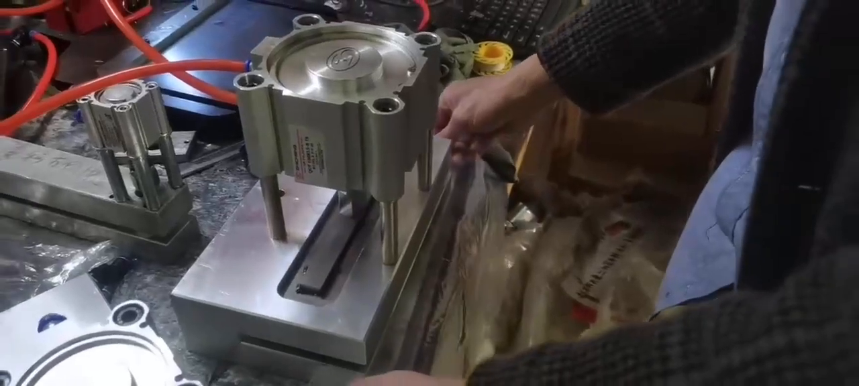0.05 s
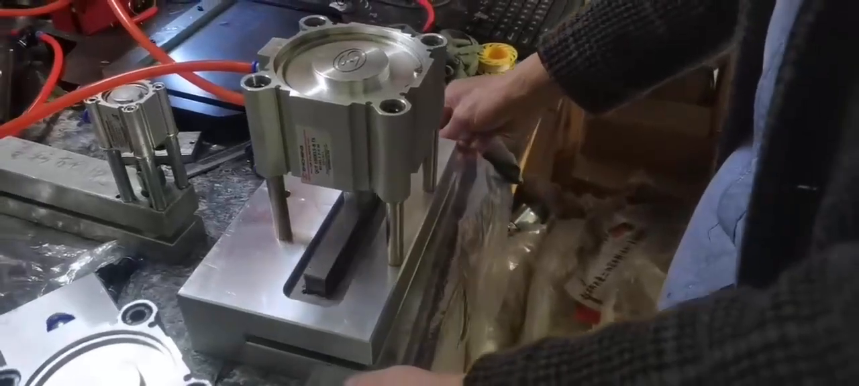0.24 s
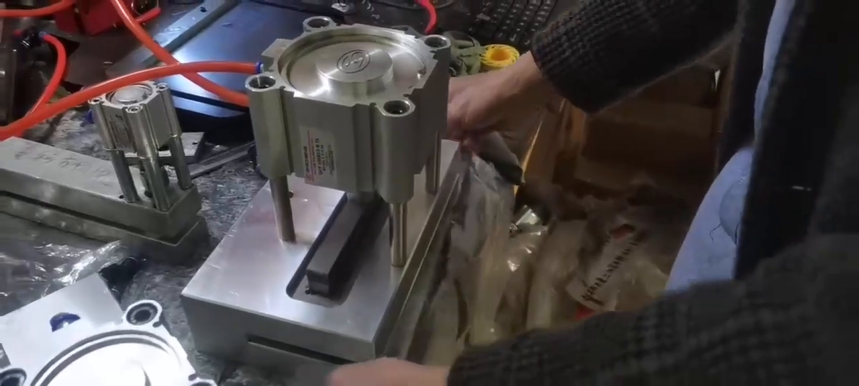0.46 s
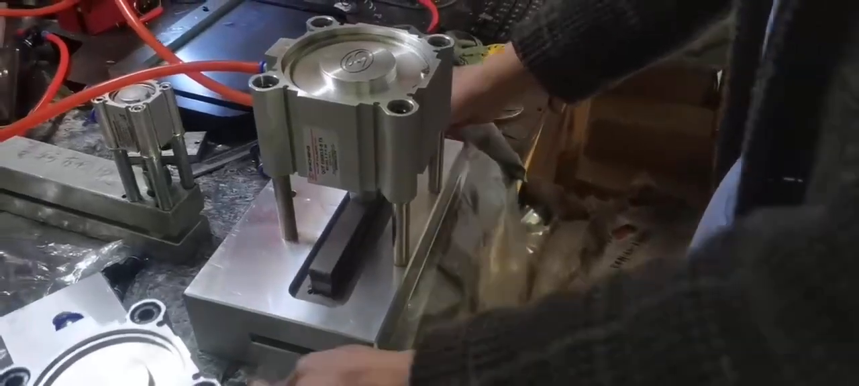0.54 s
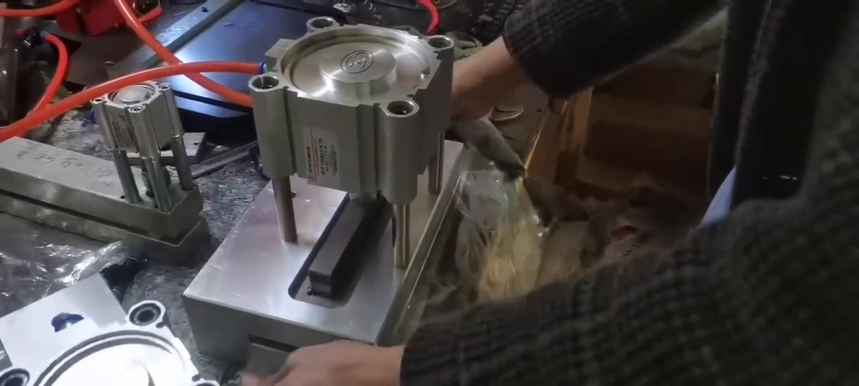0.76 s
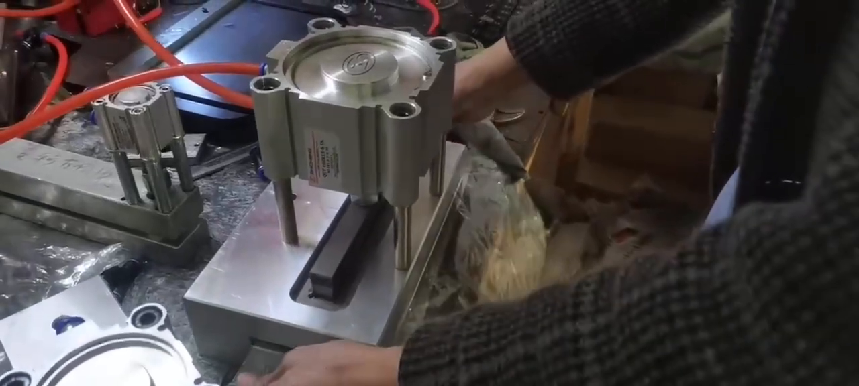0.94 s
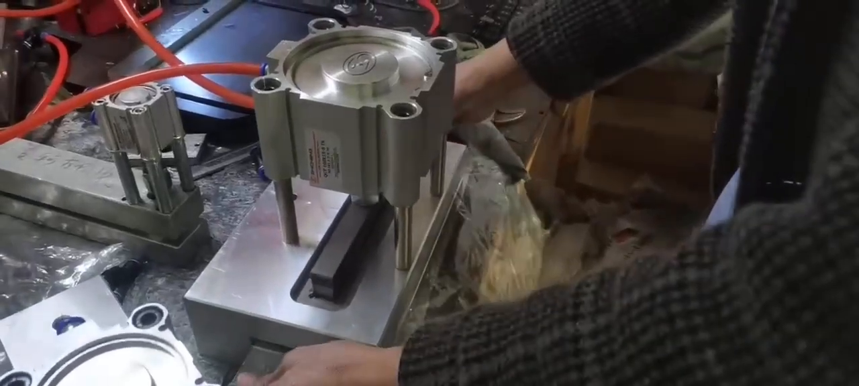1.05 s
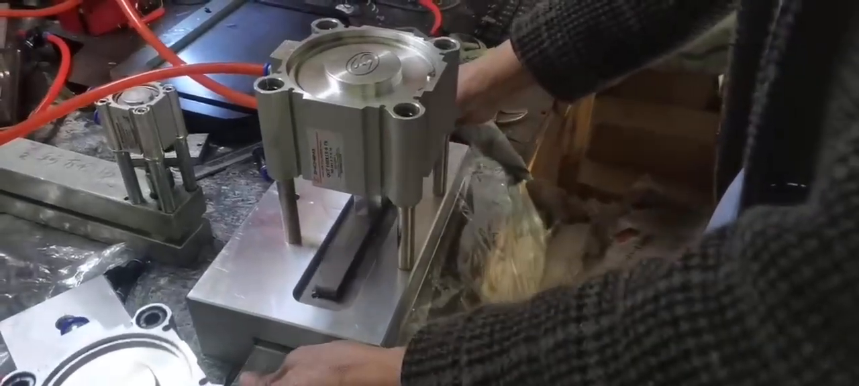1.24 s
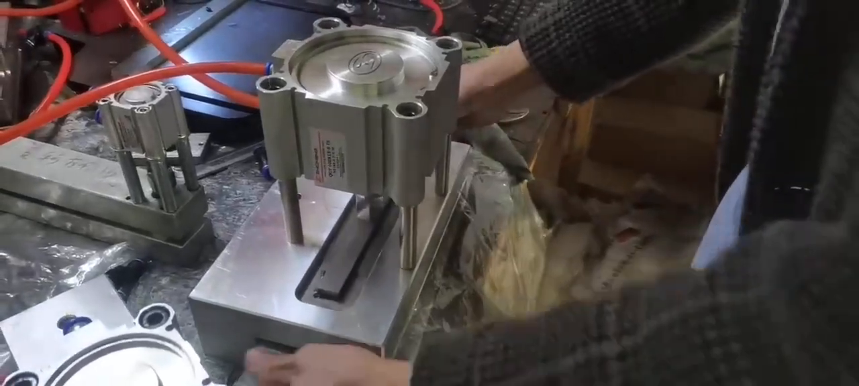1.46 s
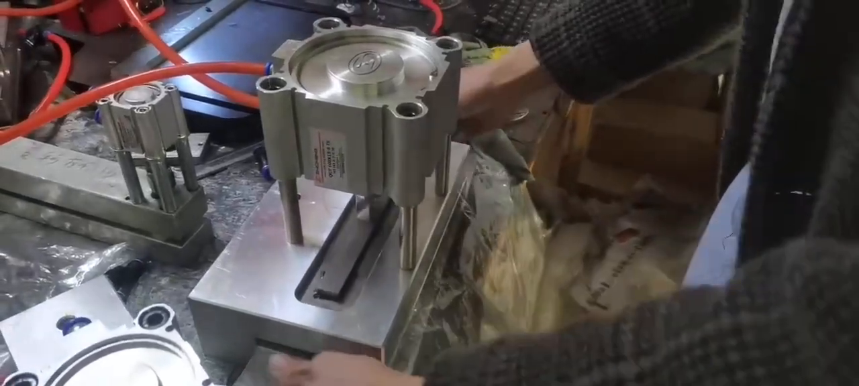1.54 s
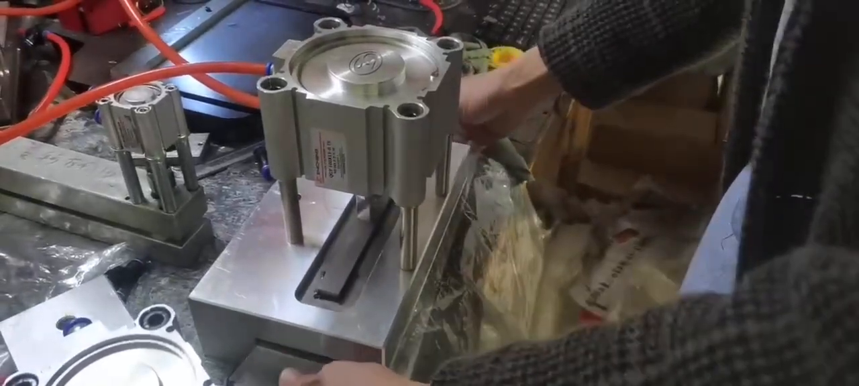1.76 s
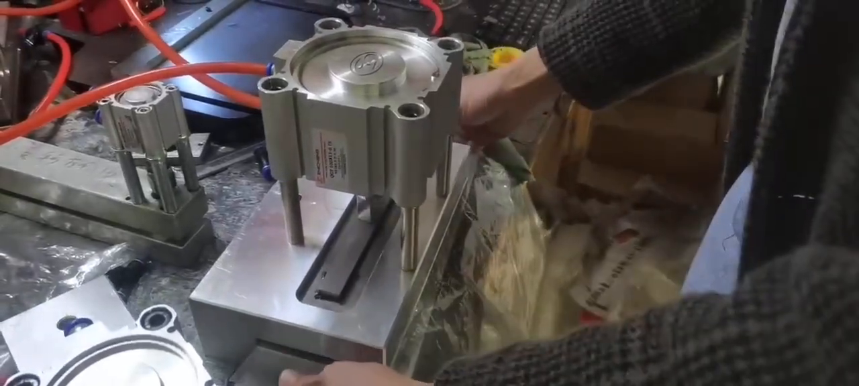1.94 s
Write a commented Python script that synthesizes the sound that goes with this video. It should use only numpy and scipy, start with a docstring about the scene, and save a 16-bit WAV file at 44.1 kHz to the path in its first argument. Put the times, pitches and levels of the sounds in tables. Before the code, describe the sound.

Small air-powered press fires down then back with snappy valve clicks, exhaust hisses and steel knocks

```python
"""A steady air leak, a low rumble and faint hums fill a workshop: shaped noise and brief sine swells.
Then a small pneumatic punch on a bench makes one stroke down and, about a second later, one stroke back.
On each stroke air hisses from the exhaust (noise with whistling ports) and the valve clicks and puffs.
Steel parts knock and ring the die, and the piston hits its stops and makes the bench boom (fading sines).
The room answers the air and the steel with a fading tail of noise."""
import sys
import numpy as np
from scipy import signal
from scipy.fft import rfft, irfft, next_fast_len
from scipy.io import wavfile
from scipy.ndimage import uniform_filter1d

SR = 44100
rng = np.random.default_rng(int(sys.argv[2]) if len(sys.argv) > 2 else 0)


def inscribe(sig):
    """Save sig as 16-bit PCM at rate SR to the path in sys.argv[1].

    A 1-D sig is mono; a 2-D sig holds one channel per row.
    Samples are clipped to [-1, 1] before scaling.
    """
    pcm = np.round(np.clip(np.atleast_2d(sig).T, -1, 1) * 32767)
    wavfile.write(sys.argv[1], SR, pcm.astype(np.int16))


N = 88200
TIME = np.arange(N) / SR

# Tone colour of the air leak: pitch_hz, level_db (per Hz, relative)
LEAK_SPECTRUM = [(400, -8), (900, -16), (1120, -12.5), (1720, -17), (1960, -9), (2970, -9), (4140, 0),
                 (5300, -6), (6600, 1.5), (7900, -9.5), (9850, -9), (13800, -8), (14200, -45)]
# Loudness of the air leak: time_s, level_db
LEAK_LEVEL = [(0, -46.5), (.7, -47.5), (1.05, -46), (1.5, -49), (2, -50.5)]
# Tone colour of the building's rumble: pitch_hz, level_db (per Hz, relative)
RUMBLE_SPECTRUM = [(15, -37), (25, -6.5), (54, 0), (135, -13.5), (184, -7.5), (256, -13.5), (281, -17),
                   (367, -21), (600, -53), (780, -108)]
# Loudness of the rumble: time_s, level_db
RUMBLE_LEVEL = [(0, -42), (.2, -48.5), (.7, -47.5), (.9, -52), (1.0, -47), (1.3, -44.5), (1.5, -49.5),
                (1.75, -57), (1.93, -48), (2, -43.5)]
# Faint hums that swell and fade: middle_s, length_s, pitch_hz, level_db
HUMS = [(.005, 0.022, 172, -35), (0.622, 0.42, 547.5, -61), (0.897, 0.12, 247.3, -53),
        (1.737, 0.21, 48.04, -40.5), (1.826, 0.047, 189.6, -52.5), (1.932, 0.086, 184.7, -43)]

# Exhaust air, one list for each stroke: time_s, level_db, treble_db and low_db (both relative to the body)
EXHAUST_STROKES = [
    [(.2005, -43, -8, -19), (.2025, -23.5, 3, -2), (.212, -24.5, -11, -22), (.222, -17.5, -7, -14.5),
     (.26, -21, -4, -11.5), (.32, -25.5, -10.5, -11.5), (.36, -22, -12.5, -7.5), (.41, -22.5, -9, -20),
     (.45, -32.5, -8, -9.5), (.48, -41, -18, -15), (.56, -55, -30, -1)],
    [(1.092, -41, -13, -12), (1.1075, -34, -17, -31), (1.1115, -22, -19, -5), (1.13, -18.5, -8, -19),
     (1.155, -28, -7.5, -49), (1.186, -27.5, -12, -39), (1.235, -23.5, -11, -23.5),
     (1.285, -26, -13.5, -2.5), (1.34, -39.5, -16, -26), (1.40, -54, -20, -11), (1.46, -59, -12, -12)],
]
# Tone colour of the main hiss: pitch_hz, level_db (per Hz, relative)
JET_SPECTRUM = [(500, -30), (858, -11), (1850, -9), (2500, -2.5), (3040, -5), (4190, 0), (5220, -2.5),
                (7030, 3), (7800, -8), (10100, -18), (17200, -120)]
# Tone colour of the treble part: pitch_hz, level_db (per Hz, relative)
JET_TREBLE_SPECTRUM = [(9000, -9), (10300, 6.5), (11300, -0.5), (12900, 7), (13900, -3.5), (14300, -36)]
# Tone colour of the low rush: pitch_hz, level_db (per Hz, relative)
JET_LOW_SPECTRUM = [(60, 9), (150, 4.5), (250, 4), (450, -2), (900, -24.5), (1900, -3), (2500, -24)]
# Whistling exhaust ports: pitch_hz, half_width_hz, down_stroke_db, back_stroke_db (relative)
PORT_WHISTLES = [(2640, 130, 4, -8), (4240, 470, 6, -2.5), (6770, 220, -1, -6), (7270, 390, -15, 5)]
WHISTLE_DB = -5  # all ports together, relative to the main hiss

# Valve switching: click_s, click_db, click_hz, click_rise_s, crack_db, puff_s, puff_db
VALVE_SWITCHES = [(0.2036, 2.5, 4260, 0.0018, -5.5, .2135, -6),
                  (1.1085, -13.5, 2966, 0.00085, -10.5, 1.1162, -8)]
# Tones of the thump in the hoses: pitch_hz, level_db (relative), fade_s (time to fall 60 dB)
PUFF_TONES = [(134.5, -11.5, 0.11), (161.4, -8.5, 0.13), (202.5, 4.5, 0.031), (281, -3, 0.035),
              (359.7, -23.5, 0.2), (463.7, -25.5, 0.19)]
CLICK_FADE_S, CRACK_HALF_WIDTH_HZ = 0.012, 9900  # the fade is the time to fall 60 dB
PUFF_RISE_S, PUFF_CUT_HZ = 0.0023, 52  # the hoses radiate little below this pitch

# How fast the workshop's answer dies: pitch_hz, fade_s (time to fall 60 dB)
ROOM_FADE = [(100, 0.18), (500, 0.38), (2000, 0.62), (5000, 0.36), (12000, 0.04)]
ROOM_AIR_DB, ROOM_STEEL_DB = -13, -14  # how much of each sound is sent to the room

# Steel hitting steel: start_s, level_db, best_hz (pitch excited most), spread_octaves
STEEL_KNOCKS = [(0.246, -19.5, 1430, 0.61), (.3302, -14.5, 2070, 1.17), (.348, -19.5, 2900, 0.79),
                (1.1545, -13.5, 1660, 0.16), (1.1552, -14, 7050, .3), (1.156, -15.5, 2580, 0.085),
                (1.2625, -20, 950, 0.31)]
# Ringing tones of the die: pitch_hz, level_db (relative), fade_s (time to fall 60 dB)
DIE_TONES = [(769, -7.5, 0.14), (855, 4.5, 0.017), (1027, -5.5, 0.042), (1525, -6.5, 0.039),
             (1641, -3, 0.042), (2220, 7, 0.04), (2657, -12, 0.17), (2790, -5.5, 0.065), (2940, 0, 0.039),
             (3125, -9, 0.085), (6980, 10, 0.016)]
STEEL_RISE_S, STEEL_SCATTER_S = 0.0011, 0.00053

# Piston stops shaking the bench: start_s, level_db, best_hz (pitch excited most), spread_octaves
PISTON_STOPS = [(.3305, -9.5, 115, 0.78), (.376, -15.5, 109, 0.6), (1.263, -20, 143, 0.65),
                (1.277, -31, 127, 0.55), (1.325, -22.5, 177, 0.29), (1.44, -41, 185, 0.52)]
# Booming tones of the bench: pitch_hz, level_db (relative), fade_s (time to fall 60 dB)
BENCH_TONES = [(49.8, -10, 1), (82.2, -8, 0.86), (103.5, -15, 0.83), (123.5, -3.5, 0.5), (138.6, -2, 0.22),
               (151.3, -9.5, 0.27), (166.5, -15, 0.71), (192, -19.5, 0.59), (293, -2.5, 0.13)]
BENCH_RISE_S = 0.0062

# Treble band that stays silent: low_edge_hz, high_edge_hz
SILENT_BAND = (8000, 9500)
TOP_HZ, LOW_CUT_HZ = 15100, 11.5


def amp(db):
    """Turn decibels into a plain multiplier."""
    return 10 ** (np.asarray(db) / 20)


def unit(x):
    """Scale a signal to an average (rms) strength of 1."""
    return x / np.sqrt(np.mean(x ** 2) + 1e-20)


def along(points, hz):
    """Read a value between (pitch, value) points, on a logarithmic pitch axis."""
    point_hz, values = np.transpose(points)
    return np.interp(np.log(hz + 1), np.log(point_hz + 1), values)


def curves(rows, outside=None):
    """Give one value per sample for each column after the time."""
    times, *columns = np.transpose(rows)
    return [np.interp(TIME, times, column, outside, outside) for column in columns]


def filtered(x, response):
    """Multiply each frequency of x by the response at that frequency."""
    size = next_fast_len(N + SR // 2)  # spare room so the end does not wrap onto the start
    hz = np.fft.rfftfreq(size, 1 / SR)
    return irfft(rfft(x, size) * response(hz), size)[:N]


def shape(points):
    """Make the gain curve of a (pitch, level) spectrum, silent outside its ends."""
    return lambda hz: amp(along(points, hz)) * (hz >= points[0][0]) * (hz <= points[-1][0])


def rush(gain, patchy_db):
    """Rushing air or rumble: coloured noise of rms 1 whose loudness varies in random patches."""
    grid = signal.stft(rng.standard_normal(N + 512), nperseg=512)[2]
    # Smooth random numbers over pitch, then over time, so neighbours share a patch
    patches = uniform_filter1d(rng.standard_normal(grid.shape), size=5, axis=0)
    patches = uniform_filter1d(patches, size=6, axis=1)
    noise = signal.istft(grid * amp(patchy_db * unit(patches)), nperseg=512)[1][:N]
    return unit(filtered(noise, gain))


def soft_start(t, rise_s):
    """Rise smoothly from 0 towards 1."""
    return 1 - np.exp(-(t / rise_s) ** 2)


def ring(start_s, tones, rise_s):
    """A struck object rings as several sines, each fading at its own speed."""
    t = np.maximum(TIME - start_s, 0)
    tone_sum = sum(amp(db - 60 * t / fade_s) * np.sin(2 * np.pi * hz * t) for hz, db, fade_s in tones)
    return soft_start(t, rise_s) * tone_sum


def struck(blows, tones, rise_s, scatter_s):
    """Each blow mostly rings the tones near its own pitch; scatter_s spreads their starts at random."""
    out = np.zeros(N)
    for blow_s, blow_db, best_hz, spread_octaves in blows:
        for hz, tone_db, fade_s in tones:
            distance = np.log2(hz / best_hz) / spread_octaves
            level_db = blow_db + tone_db - 6 * distance ** 2
            start_s = blow_s + scatter_s * rng.random()
            out += ring(start_s, [(hz, level_db, fade_s)], rise_s)
    return out


def background():
    """Leaking air and the building's rumble are shaped noise; the passing hums are sines."""
    leak = amp(curves(LEAK_LEVEL)[0]) * rush(shape(LEAK_SPECTRUM), patchy_db=2.0)
    rumble = amp(curves(RUMBLE_LEVEL)[0]) * rush(shape(RUMBLE_SPECTRUM), patchy_db=3)
    hums = np.zeros(N)
    for middle_s, length_s, hz, db in HUMS:
        swell = np.exp(-(2 * (TIME - middle_s) / length_s) ** 4)
        hums += amp(db) * swell * np.sin(2 * np.pi * hz * TIME)
    return leak + rumble + hums


def exhaust():
    """Turbulent jet: a broad hiss, ports that whistle differently each way, a treble and a low rush."""
    hiss = rush(shape(JET_SPECTRUM), patchy_db=2.5)
    treble = rush(shape(JET_TREBLE_SPECTRUM), patchy_db=3.0)
    low = rush(shape(JET_LOW_SPECTRUM), patchy_db=4.5)
    out = np.zeros(N)
    for way, stroke in enumerate(EXHAUST_STROKES):  # 0 is down, 1 is back

        def ports(f):
            return sum(amp(db[way]) / (1 + ((f - hz) / half_width) ** 2)
                       for hz, half_width, *db in PORT_WHISTLES)

        body = unit(hiss + amp(WHISTLE_DB) * rush(ports, patchy_db=0))
        level_db = curves(stroke, outside=-150)[0]  # practically silent outside the stroke
        treble_db, low_db = curves(stroke)[1:]
        out += amp(level_db) * (body + amp(treble_db) * treble + amp(low_db) * low)
    return out


def valve():
    """The spool snaps over with a bright click, then the pressure step thumps in the hoses."""
    out = np.zeros(N)
    for click_s, click_db, click_hz, rise_s, crack_db, puff_s, puff_db in VALVE_SWITCHES:
        t = np.maximum(TIME - click_s, 0)

        def crack_gain(f):
            in_band = (f > 2400) * (f < 14200)
            return in_band / (1 + ((f - click_hz) / CRACK_HALF_WIDTH_HZ) ** 2)

        crack = unit(filtered(rng.standard_normal(N), crack_gain))
        snap = amp(click_db) * np.sin(2 * np.pi * click_hz * t) + amp(crack_db) * crack
        out += amp(-60 * t / CLICK_FADE_S) * soft_start(t, rise_s) * snap

        thump = ring(puff_s, PUFF_TONES, PUFF_RISE_S)
        out += amp(puff_db) * filtered(thump, lambda f: (1j * f / (PUFF_CUT_HZ + 1j * f)) ** 2)
    return out


def room(x):
    """The workshop answers with a noise tail in which each frequency dies at its own speed."""
    hz, t, grid = signal.stft(rng.standard_normal(SR), SR, nperseg=256)
    fade_s = along(ROOM_FADE, hz)[:, None]
    tail = signal.istft(grid * amp(-60 * t / fade_s), SR, nperseg=256)[1]
    delayed = np.pad(x, (300, 0))  # 300 samples, about 7 ms
    return signal.fftconvolve(delayed, tail / np.linalg.norm(tail))[:N]


def die():
    """Steel parts knock together and ring; the tones of a knock start a tiny moment apart."""
    return struck(STEEL_KNOCKS, DIE_TONES, STEEL_RISE_S, STEEL_SCATTER_S)


def bench():
    """Each stop and rebound of the piston sets the bench booming."""
    return struck(PISTON_STOPS, BENCH_TONES, BENCH_RISE_S, scatter_s=0)


def scene():
    """Add all the sounds; only the air and the steel are sent to the room."""
    air = exhaust() + valve()
    steel = die()
    echo = room(amp(ROOM_AIR_DB) * air + amp(ROOM_STEEL_DB) * steel)
    return (background() + air + echo + steel + bench())[None]


def record(dry):
    """The microphone loses the deepest bass; the silent treble band and everything above the top are cut."""
    def response(hz):
        outside_band = (hz < SILENT_BAND[0]) | (hz > SILENT_BAND[1])
        bass_cut = hz ** 2 / (hz ** 2 + LOW_CUT_HZ ** 2)
        return (hz < TOP_HZ) * outside_band * bass_cut

    return filtered(dry[0], response)[None]


dry = scene()
out = record(dry)
inscribe(out)
```